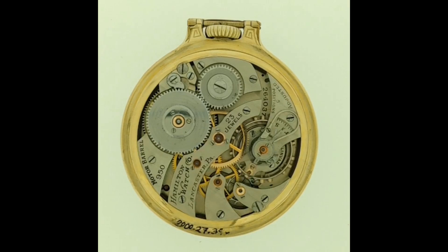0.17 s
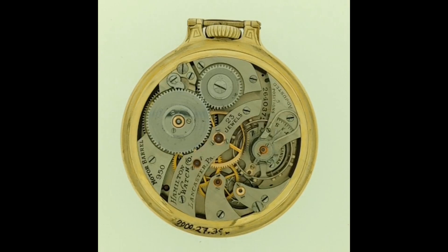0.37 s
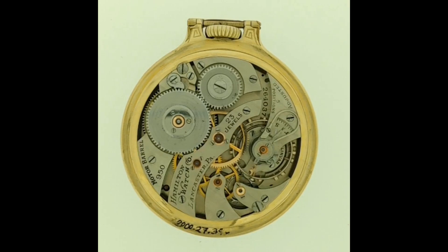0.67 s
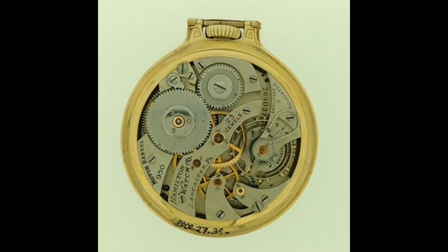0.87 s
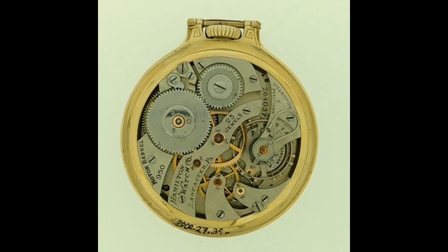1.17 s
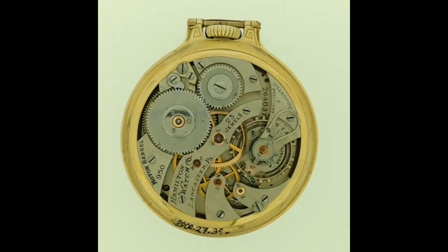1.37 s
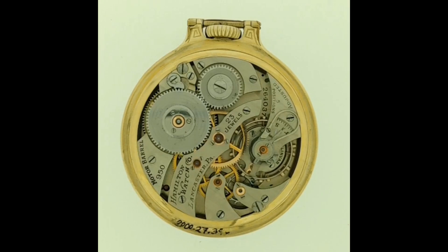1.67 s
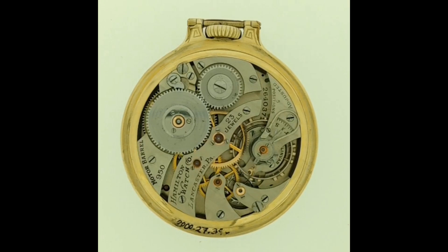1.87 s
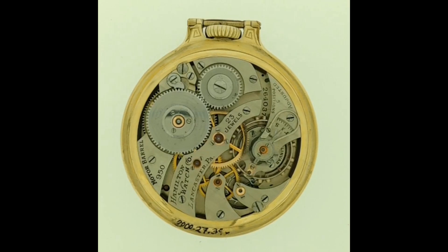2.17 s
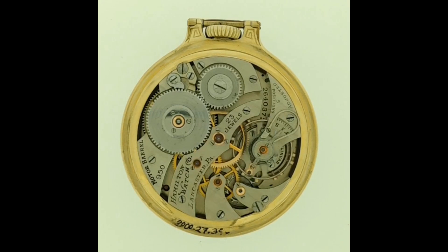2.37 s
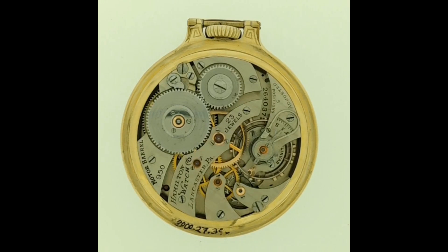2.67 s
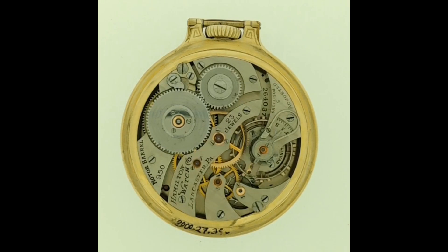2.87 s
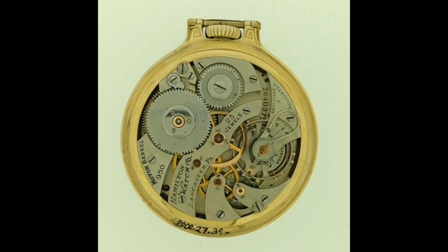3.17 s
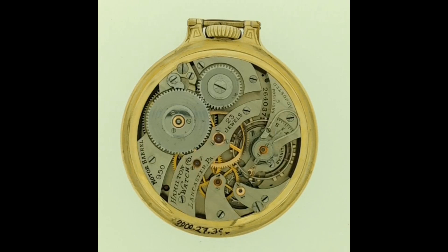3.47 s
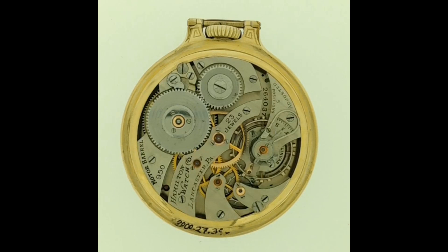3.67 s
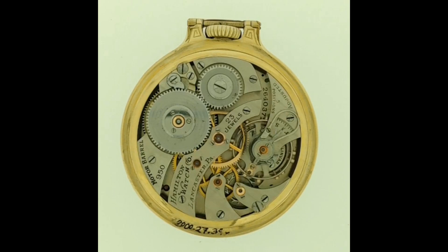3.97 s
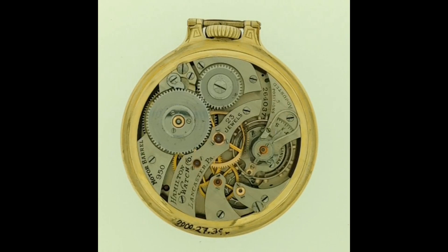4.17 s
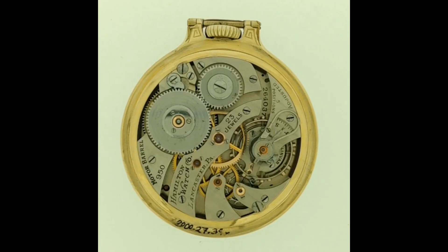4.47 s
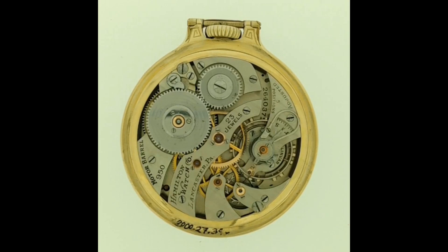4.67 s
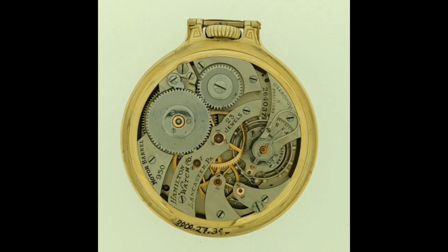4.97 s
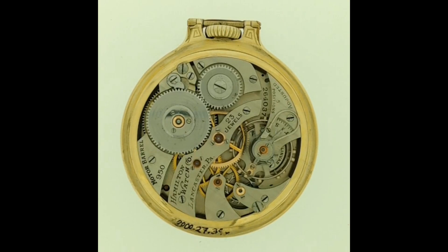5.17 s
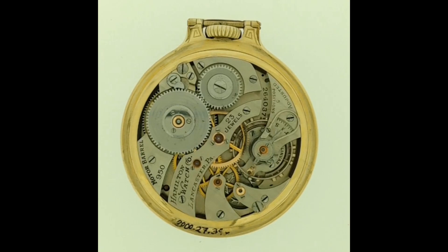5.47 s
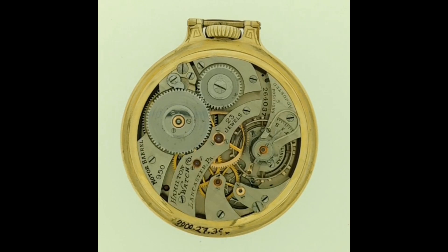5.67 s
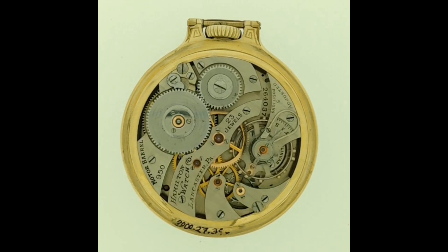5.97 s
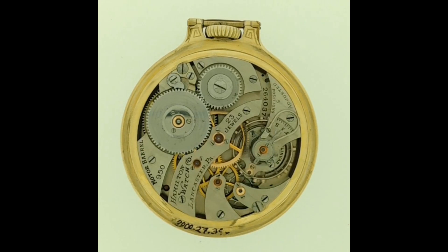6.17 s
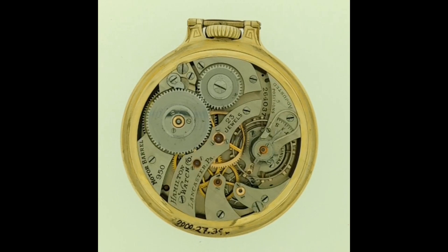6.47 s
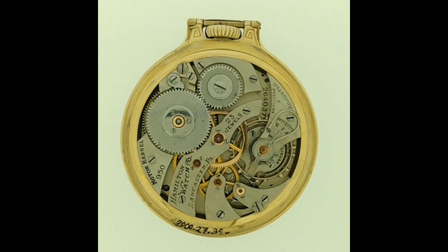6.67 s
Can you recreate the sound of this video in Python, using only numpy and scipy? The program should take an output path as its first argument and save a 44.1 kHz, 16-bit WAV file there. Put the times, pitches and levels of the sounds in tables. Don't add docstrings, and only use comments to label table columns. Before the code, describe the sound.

Fast, light metallic watch ticking, five per second, over a deep ventilation drone and soft distant footfalls, with one hard latch click at the end.

```python
import sys
import numpy as np
from scipy import signal
from scipy.fft import rfft, irfft, next_fast_len
from scipy.io import wavfile
from scipy.ndimage import uniform_filter1d, map_coordinates

SR = 44100
rng = np.random.default_rng(int(sys.argv[2]) if len(sys.argv) > 2 else 0)


def wav_record(signal):
    frames = np.transpose(np.atleast_2d(signal))
    bounded = np.clip(frames, -1, 1)
    quanta = np.round(bounded * 32767).astype(np.int16)
    wavfile.write(sys.argv[1], SR, quanta)


def magnitude_from_level(level_db):
    exponent = np.asarray(level_db, float) / 20
    return 10 ** exponent


N = 301644
TOP_HZ = 11050


def unit(x):
    return x / np.sqrt(np.mean(x ** 2) + 1e-20)


def filtered(x, response):
    m = next_fast_len(len(x) + 8192)
    return irfft(rfft(x, m) * response(np.fft.rfftfreq(m, 1 / SR)), m)[:len(x)]


def sloped(points):
    hz, db = np.transpose(points)
    return lambda f: magnitude_from_level(np.interp(np.log(f + 1), np.log(hz), db))


def humped(modes, steep):
    def gain(f):
        powers = (magnitude_from_level(2 * db) / (1 + np.abs(2 * (f - hz) / abs(width)) ** steep) for hz, width, db in modes)
        return np.sqrt(sum(powers))
    return gain


def noise(response, count=N):
    return unit(filtered(rng.standard_normal(count), response))


def add(track, s, sound):
    part = track[round(s * SR):][:len(sound)]
    part += sound[:len(part)]


def ring(modes, scatter_db):
    hz, db, t60 = np.transpose(modes)[:, :, None]
    t = np.arange(SR // 6) / SR
    luck = rng.standard_normal((len(modes), 2))
    decay = magnitude_from_level(db + scatter_db * luck[:, :1] - 60 * t / t60)
    waves = decay * np.sin(2 * np.pi * hz * t + luck[:, 1:])
    return waves.sum(axis=0) * (1 - np.exp(-t / 0.00028))


# drop level/dB, main plate ring/dB, low-high tilt/dB
ENTRY_TEETH = [(-63, 3, 2), (-64, -1, 1.5), (-64, 5.5, 1), (-63, 9.5, -8), (-63, 1, -1), (-62, 10, -1),
               (-64, 1.4, -3), (-66, 3, -5), (-61.5, -15, -2), (-64.5, -2, 4), (-63, 1, -3.5),
               (-63, -1, -2), (-63.5, 2, -2.5), (-63, -1, 3), (-63, -12, 3)]
# drop level/dB, main plate ring/dB, low-high tilt/dB
EXIT_TEETH = [(-61, 3, -3.5), (-64, 6, 1), (-60, -6, -2.5), (-63.5, 3, 3.5), (-62.5, 4, -1),
              (-63.2, -2.9, 1), (-62, -1.2, -3), (-63.5, 6, 0.5), (-62, 5, -3.5), (-64.5, 5, 3),
              (-61.5, 1, -6), (-63.5, 5, -4), (-59.5, -1, -2.5), (-62.5, 0, 1), (-63, 1, -1.5)]


def beats():
    first_drop_s, swing_s, beat_error_s = .1616, .1999, .0031
    unlock_level_db = -71.5
    k = np.arange(int((N / SR - first_drop_s) / swing_s) + 1)
    drop_db, ring_db, tilt_db = np.array([ENTRY_TEETH, EXIT_TEETH])[k % 2, k // 2 % len(ENTRY_TEETH)].T
    drop_s = first_drop_s + k * swing_s + k % 2 * beat_error_s
    return np.transpose([drop_s, drop_db, unlock_level_db - drop_db, ring_db, tilt_db])


# f/Hz, t60/s, then level/dB for entry drop, exit drop, entry unlock, exit unlock
PLATE_MODES = [(1640, 0.13, -19, -11.5, -6, -13), (2186, 0.15, -10.5, -8, -10.5, -16),
               (3610, 0.032, -7.5, -7, -28, -11), (4150, 0.059, -3.5, -3.5, -1.5, -9),
               (4490, 0.064, -14, -2, -11, -16), (4820, 0.082, -11, -15, -5, 1),
               (4960, 0.11, -8.5, -10, -7, -4.5), (5010, .065, -6, -17, -13, 1),
               (5350, 0.038, -23, -1.5, -2, -12), (5490, .04, -11, -2, -7, 5),
               (5840, 0.047, -2.5, -16, -9, -16), (6300, 0.05, -6, -21.5, -8, -23),
               (6440, 0.043, -6.5, 2.5, 0.5, -12), (6640, 0.066, -2.5, -9, -12, -6),
                (7680, 0.016, 0, 5.5, -14, -23), (7874, 0.041, 2.5, 2.5, -11, -5),
                (8220, 0.037, -4.5, 0, -11, 0), (8530, 0.02, 5, -1.5, -14, -24),
                (9100, 0.1, -6.5, -20, -5, -9.5), (8860, 0.028, 0, 5.5, 7.5, 4),
                (9340, 0.057, -2, -5.5, -18, -13), (9400, 0.046, -19, -9, -29, -12),
                (9910, 0.06, -4, -14, -2.5, -14), (10210, 0.065, -6, -6, -1, -6),
                (11150, 0.058, -13, -14, -25, -18)]
# lead t/s, level re unlock/dB
LEAD_BLOWS = [
    [(.0229, 0), (.0193, -2), (.0122, -2), (.0098, -7)],
    [(.0226, 2), (.0198, -9), (.0076, -3), (.0048, -6)],
]
# lag t/s, level/dB
DROP_BLOWS = [
    (-.0005, 0),
    (.003, -6),
    (.0112, -12.5),
    (.0142, -15),
]


def watch():
    out, t = np.zeros(N), np.arange(SR // 8) / SR
    rows = beats()
    hz, t60, *colour_db = np.transpose(PLATE_MODES)[:, :, None]
    sign = rng.choice([-1, 1], (4, len(hz), 1))
    chance = rng.standard_normal((len(rows), 8, len(hz), 3))
    cracks = rng.standard_normal((len(rows), 8, 600))
    wear = rng.standard_normal((len(rows), 2)) * [.0003, .5]
    brittle = signal.butter(2, [4200, 10000], "bandpass", fs=SR, output="sos")
    main = (hz > 3900) & (hz < 4300)
    low = np.clip((7000 - hz) / 2000, -.5, .5)
    rise = 1 - np.exp(-t / np.where(main, .003, .0002))
    fade = magnitude_from_level(-60 * t / (np.where(main, 1.1, .62) * t60)) * rise
    for k, (s, db, unlock_db, ring_db, tilt_db) in enumerate(rows):
        side = k % 2
        s, tilt_db = s + wear[k, 0], tilt_db + wear[k, 1]
        drop_db = db - 6.5 + main * (ring_db + 2) + low * tilt_db
        blows = [(s + lag, drop_db + g, side) for lag, g in DROP_BLOWS]
        blows += [(s - lead, db + unlock_db + g - 7.5, 2 + side) for lead, g in LEAD_BLOWS[side]]
        for (at, level_db, kind), luck, crack in zip(blows, chance[k], cracks[k]):
            size = sign[kind] * magnitude_from_level(level_db + colour_db[kind] + 1.3 * luck[:, :1])
            pitch = hz * (1 + 0.0019 * luck[:, 2:])
            waves = size * fade * np.sin(2 * np.pi * pitch * t + 0.48 * luck[:, 1:2])
            add(out, at, np.sum(waves, axis=0))
            crack_fade = magnitude_from_level(np.mean(level_db) + 9 - 60 * t[:600] / .012)
            add(out, at, crack_fade * signal.sosfilt(brittle, crack))
    return out


def spikes():
    t, gate = np.arange(SR // 100) / SR, np.zeros(N)
    for s, db, unlock_db, *_ in beats():
        add(gate, s - .0005, magnitude_from_level(db - 21 - 60 * t / .016))
        add(gate, s - .0228, magnitude_from_level(db + unlock_db - 13 - 60 * t / .012))
    return gate * noise(lambda f: f > TOP_HZ)


def top_band_noise():
    frame_s, start_s = 1024 / 22050, .032
    frame = ((np.arange(N) / SR - start_s) // frame_s).astype(int) + 1
    power = np.zeros(frame[-1] + 1)
    for s, db, unlock_db, *_ in beats():
        power[frame[round((s + .002) * SR)]] += magnitude_from_level(2 * (db - 22.5))
        power[frame[round((s - .021) * SR)]] += magnitude_from_level(2 * (db + unlock_db - 24.5))
    gate = np.sqrt(np.abs(uniform_filter1d(power[frame], size=150)))
    return gate * noise(humped([(10160, 900, -2), (10900, 300, -3.5)], steep=4.6))


def room(x):
    t = np.arange(SR // 4) / SR
    tail = rng.standard_normal(len(t)) * magnitude_from_level(-60 * t / 0.12)
    delayed = np.pad(x, (130, 0))
    return signal.fftconvolve(delayed, tail / np.linalg.norm(tail))[:N]


# t/s, knock level/dB, crack level/dB
LATCH_EVENTS = [
    (6.823, -65, -74),
    (6.8308, -50, -47),
    (6.8325, -45, -47),
    (6.834, -39.5, -43),
    (6.8355, -45.5, -45.5),
    (6.8368, -38.5, -50),
    (6.8382, -40, -42.5),
]
# f/Hz, level/dB, t60/s
KNOCK_MODES = [(400, -0.5, 0.052), (700, 3.5, 0.043), (1030, 5, 0.027), (1430, 1, 0.021), (1800, -7, 0.027)]
# f/Hz, level/dB, t60/s
CRACK_MODES = [(2690, 4, 0.02), (3160, 1.5, 0.024), (4360, -5, .02), (5130, 1.5, 0.016), (5690, -2, 0.033),
               (7230, -5, 0.011), (7950, -10, .02), (8760, -12, .015), (9440, -16, 0.014),
               (3840, -11.5, 0.016), (6300, -13, 0.017), (10700, -23, .015)]


def click():
    out = np.zeros(N)
    for s, knock_db, crack_db in LATCH_EVENTS:
        knock = magnitude_from_level(knock_db) * ring(KNOCK_MODES, scatter_db=-2.5)
        crack = magnitude_from_level(crack_db) * ring(CRACK_MODES, scatter_db=4.0)
        add(out, s, knock + crack)
    return out


# t/s, peak level/dB, centre f/Hz, width/Hz, t60/s
TAP_EVENTS = [(1.275, -63.5, 1620, 500, 0.13), (1.464, -62, 1860, 1400, 0.063),
              (1.897, -69, 2100, 900, 0.098), (2.029, -68, 1700, 700, .07), (2.721, -62, 2650, 1800, 0.063),
              (2.859, -66, 1650, 300, 0.14), (2.858, -68, 3520, 1200, 0.13), (3.276, -68, 1700, 700, .07),
              (3.801, -64.5, 1330, 600, 0.11), (4.248, -65, 1900, 800, 0.074),
              (4.354, -60.5, 2090, 1500, 0.052), (4.671, -63.5, 2200, 1200, 0.089),
              (5.162, -59, 1640, 400, 0.055), (5.8, -70, 2750, 300, .08)]
# f/Hz, level/dB, t60/s
CLEAR_TAP_MODES = [(634, 3.5, .12), (1640, -2, .1), (2130, -1, 0.098), (2250, -4, 0.076), (2600, -7, 0.062),
                   (3000, -17, .06), (4250, -5, 0.067), (4530, -9, .06), (5000, -8, .04), (5900, -16, .05),
                   (7300, -14, .04), (9000, -10, .03)]
# t/s, level/dB
CLEAR_TAP_CONTACTS = [
    (5.0425, -74),
    (5.0448, -70.5),
    (5.048, -65.5),
    (5.053, -83),
]


def taps():
    out, count = np.zeros(N), SR // 6
    t = np.arange(count) / SR
    for s, db, hz, width, t60 in TAP_EVENTS:
        fade = magnitude_from_level(db - 7.5 - 60 * t / t60) * (1 - np.exp(-t / 0.0011))
        add(out, s, fade * noise(humped([(hz, width, 0)], steep=4.4), count=count))
    for s, db in CLEAR_TAP_CONTACTS:
        colour = humped([(2200, 540, 6), (4800, 3000, -5)], steep=1.5)
        wash = magnitude_from_level(1.5 - 60 * t / 0.068) * noise(colour, count=count)
        add(out, s, magnitude_from_level(db) * (ring(CLEAR_TAP_MODES, scatter_db=1.0) + wash))
    return out


# t/s, length/s, peak level/dB rms, floor f/Hz
STEPS = [(0.019, 0.081, -44.5, 62.3), (0.148, 0.051, -40.5, 94.5), (0.932, 0.065, -49.5, 60.2),
         (1.157, 0.082, -44, 57.5), (1.249, 0.32, -40.5, 59.84), (1.92, 0.042, -37, 65.4),
         (1.93, 0.071, -45.5, 117.3), (2.369, .15, -39.5, 57.9), (2.699, 0.11, -47, 62.8),
         (2.88, 0.056, -44.5, 100), (3.56, 0.16, -43, 56), (3.8, 0.042, -42, 59.6), (4.257, .14, -39, 62.9),
         (4.58, 0.18, -39, 62.6), (5.108, 0.21, -43.5, 61.2), (5.56, 0.036, -45.5, 61.7)]


def footfalls():
    rise_s, sag_db_per_s, release_db_per_s, wander_per_s = 0.016, 25, 150.5, 18
    thump_hz, thump_db, thump_release_db_per_s = 42, -6.5, 119
    out, t = np.zeros(N), np.arange(SR) / SR
    rise = 1 - np.exp(-(t / rise_s) ** 2)
    thump = magnitude_from_level(thump_db - thump_release_db_per_s * t) * np.sin(2 * np.pi * thump_hz * t)
    for s, length, db, hz in STEPS:
        level_db = db - sag_db_per_s * t - release_db_per_s * np.maximum(t - length, 0)
        wander = map_coordinates(rng.standard_normal(40), [wander_per_s * t])
        swing = np.sin(2 * np.pi * hz * t + wander) + thump
        add(out, s, np.sqrt(2) * magnitude_from_level(level_db) * rise * swing)
    return out


# f/Hz, width/Hz, level/dB
BOOM_MODES = [(40.1, 8.1, -9.5), (61.2, 12.8, -1)]
# f/Hz, width/Hz, level/dB
HUM_MODES = [(88.3, 26.6, -4.5), (119.84, 13.4, 0), (146.8, 14.7, -7), (187.4, 12, -17), (223, 36, -25.5),
             (263.3, 23.5, -19)]
# f/Hz, width/Hz, level/dB
DUCT_MODES = [(347, 110, -3), (463, 63, 0.5), (631.4, 81, -0.5), (746.6, 49, -0.5), (1002, 87, -6.5),
              (1424, 120, -11), (1650, 78, -11), (2172, 206, -16.5)]
# t/s, drone level/dB
DRONE_LEVEL = [(0.0, -50.5), (0.21, -49.5), (0.34, -49.5), (1.89, -50), (2.0, -45.5), (2.06, -50), (2.99, -48),
               (3.05, -51.5), (4.0, -46.5), (4.04, -50.5), (4.42, -48.5), (4.46, -55), (4.61, -50),
               (6.53, -51), (6.82, -49.5), (6.84, -62)]


def ventilation():
    boom = filtered(noise(humped(BOOM_MODES, steep=3.4)), lambda f: 1 / (1 + (33 / (f + 1)) ** 6))
    drone_db = np.interp(np.arange(N) / SR, *np.transpose(DRONE_LEVEL))
    hum = magnitude_from_level(1 + drone_db) * noise(humped(HUM_MODES, steep=3.82))
    duct = noise(humped(DUCT_MODES, steep=2.75))
    return magnitude_from_level(-56) * boom + hum + magnitude_from_level(-72.5) * duct


def scene():
    ticks = watch()
    near = ticks + magnitude_from_level(-12.0) * room(ticks)
    return (near + ventilation() + footfalls() + taps() + click())[None]


def band_limit(x):
    return signal.sosfilt(signal.butter(12, 15700, fs=SR, output="sos"), x)


# f/Hz, level/dB
HISS_SPECTRUM = [(200, -5.5), (900, -1.5), (2500, -2.5), (4500, -4.5), (8500, -8), (9600, -11.5),
                 (10900, -22.5), (11100, -35), (22000, -42)]


def record(dry):
    x = dry[0] + magnitude_from_level(-81) * noise(sloped(HISS_SPECTRUM)) + top_band_noise()
    x = filtered(x, lambda f: np.where(f < TOP_HZ, 1, magnitude_from_level(-25)))
    x = x + magnitude_from_level(-92.5) * rng.standard_normal(N) + spikes()
    return band_limit(x[None])


dry = scene()
out = record(dry)
wav_record(out)
```